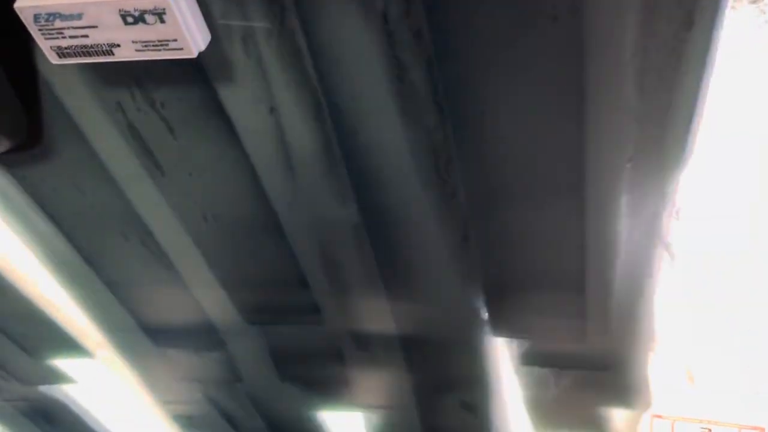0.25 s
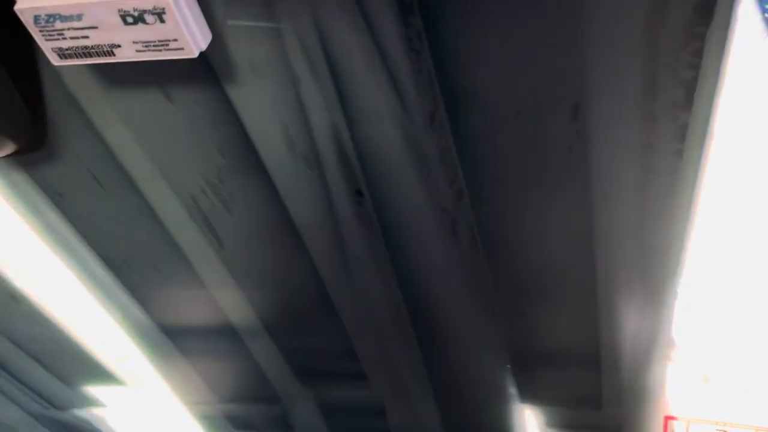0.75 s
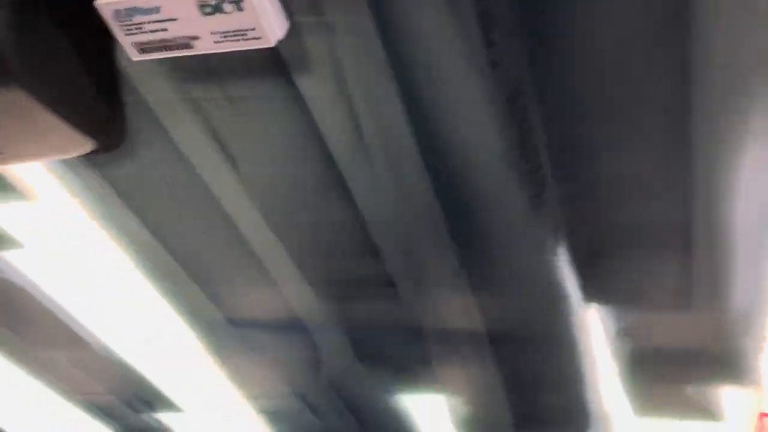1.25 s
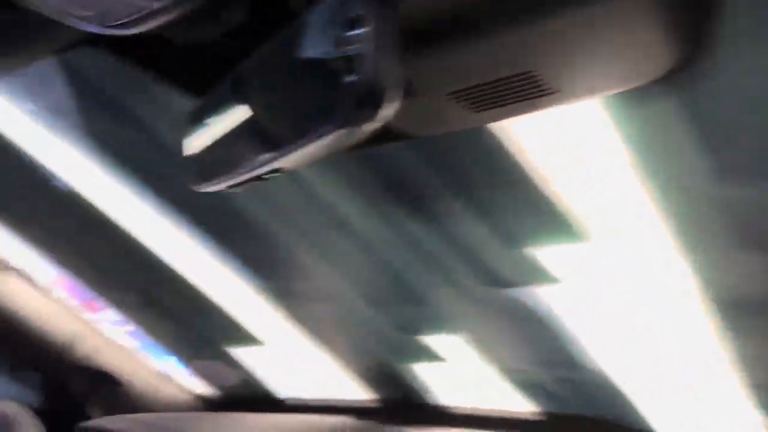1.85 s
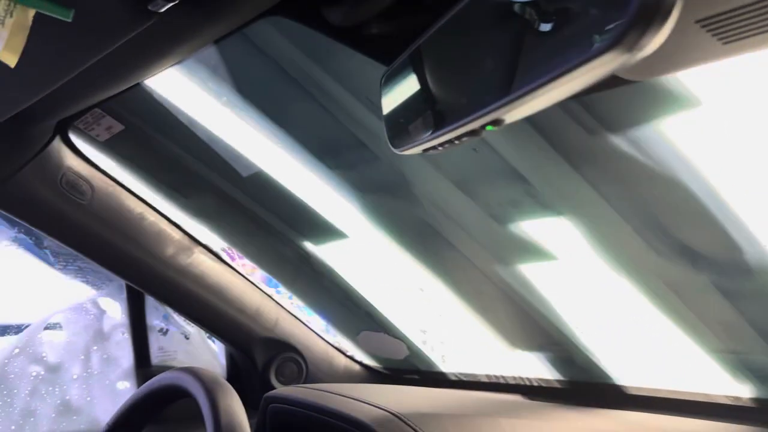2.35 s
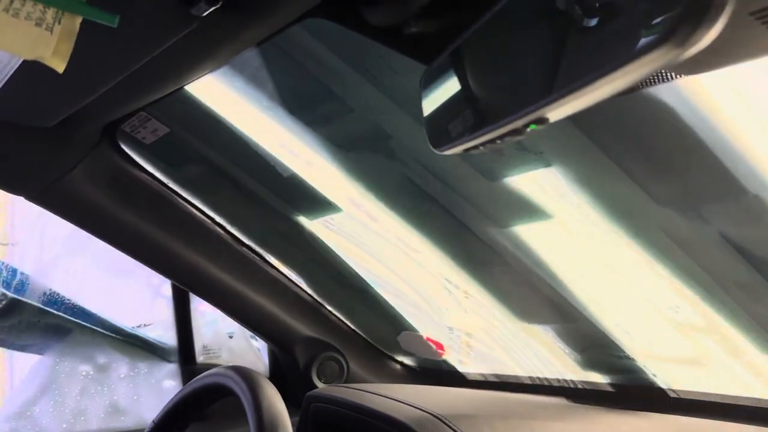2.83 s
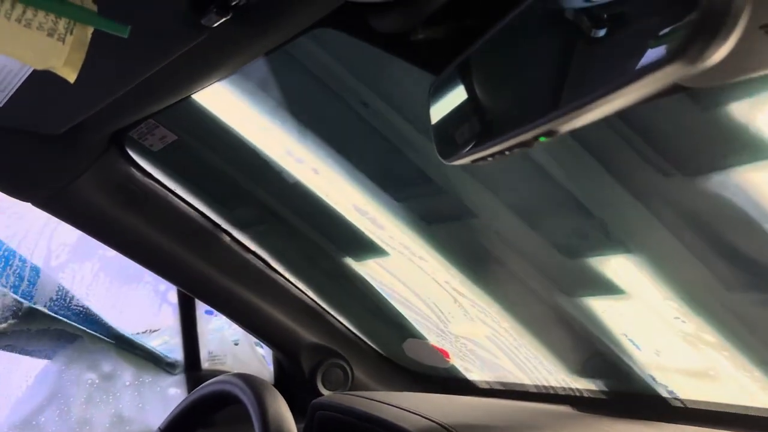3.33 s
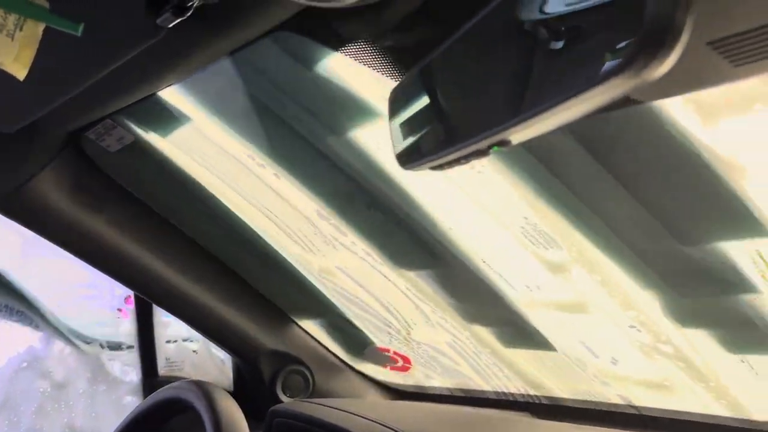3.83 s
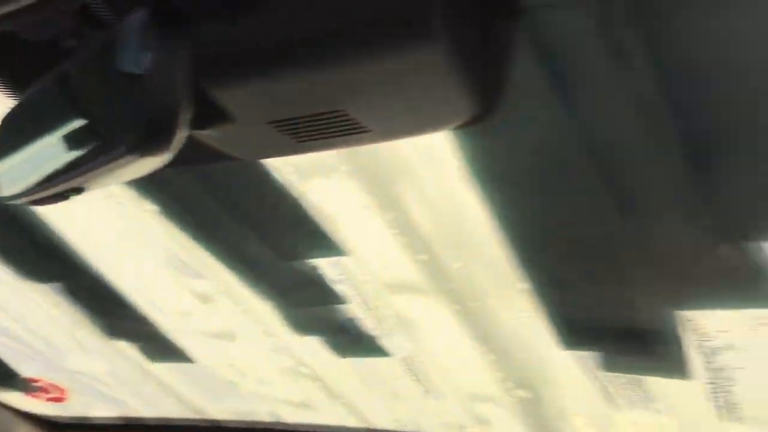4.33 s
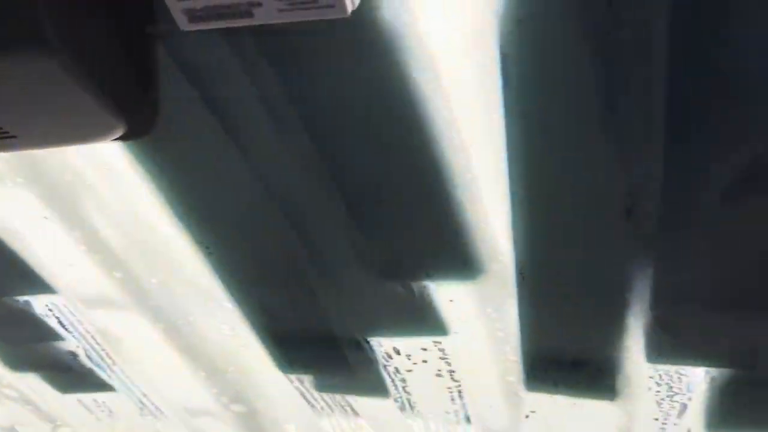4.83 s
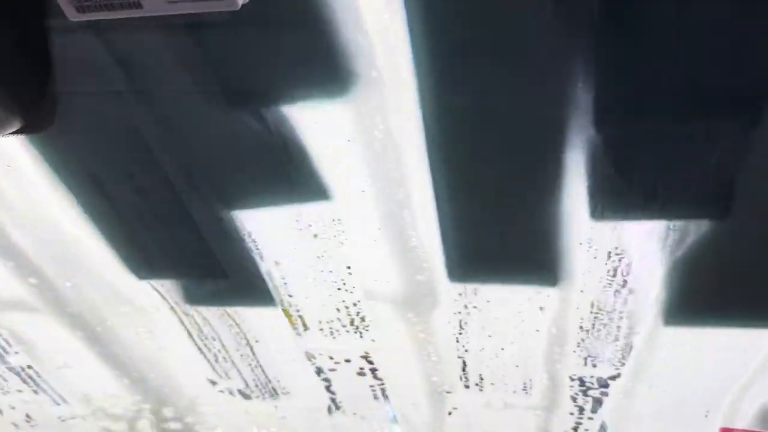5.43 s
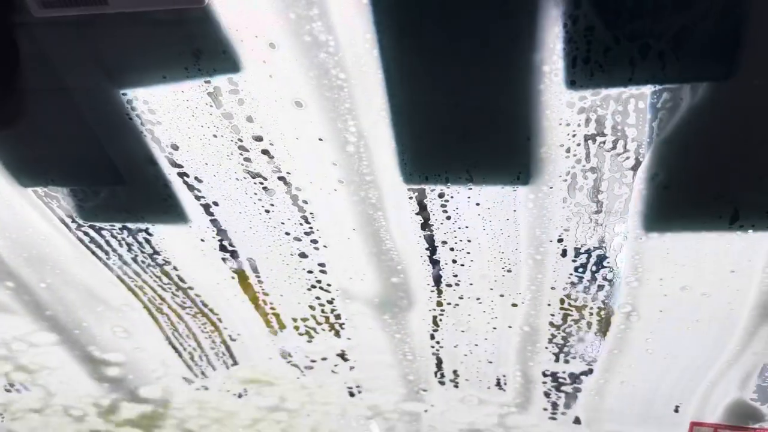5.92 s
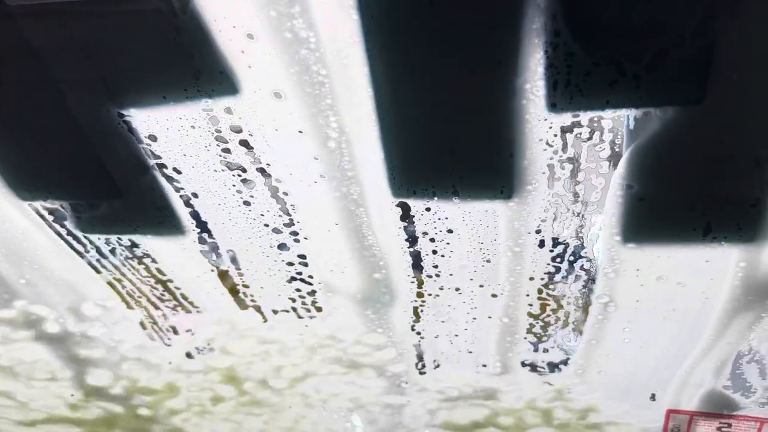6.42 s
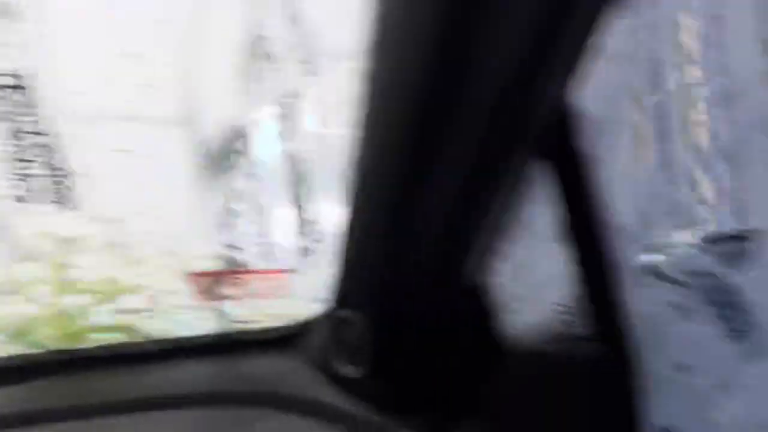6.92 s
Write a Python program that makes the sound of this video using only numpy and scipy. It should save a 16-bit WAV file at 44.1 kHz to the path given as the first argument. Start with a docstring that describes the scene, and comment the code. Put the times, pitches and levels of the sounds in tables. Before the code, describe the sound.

Inside a closed car in a wash tunnel, captured by two nearby microphones in the cabin. From 0 to 1 s a deep, uneven throb around 50 Hz dominates, over faint muffled rubbing of wet cloth on glass and a very quiet hiss. A dull panel thud comes near 0.8 s, soft knocks at 1.2-1.4 s, a slight airy swell near 1.7 s and a stronger boom at 2.0 s. Small slaps follow around 2.5 s, and it is calmest near 3-3.5 s. From 3.8 to 4.7 s the scrubbing thickens, with soft knocks and low thumps, then eases briefly. At about 5.5 s wet slaps and sharp splashy hiss break in; from 5.7 s water and cloth roar over the screen, doors and roof drum, and heavy thuds crowd together around 6.1-6.7 s. It ends at about 7.1 s on a loud, booming surge.

```python
"""Inside a car in a wash tunnel: wet cloth strips drag and slap over the windscreen and roof, then water pours on.
The cabin air throbs and booms at its lowest modes, and the body panels drum, thud and briefly ring.
The glass passes a muffled thrum, scrub and hiss: coloured noise that flutters with many small contacts.
Two microphone ports hear each sound with a likeness, delay and balance that depend on frequency."""
import sys
import numpy as np
from scipy import signal
from scipy.fft import rfft, irfft, next_fast_len
from scipy.io import wavfile
from scipy.ndimage import uniform_filter1d

SR = 44100
rng = np.random.default_rng(int(sys.argv[2]) if len(sys.argv) > 2 else 0)


def wav_out(sig):
    """Save sig, one row per channel (or a flat mono array), as 16-bit PCM at SR to the path in sys.argv[1]."""
    wavfile.write(sys.argv[1], SR, np.round(np.clip(np.atleast_2d(sig).T, -1, 1) * 32767).astype(np.int16))


N = 316197

# Strip ends landing on the glass. Each row: start in seconds, knock level in dB,
# where the knock is loudest in Hz, smack level in dB before each layer takes its share.
STRIP_SLAPS = [(1.177, -37, 450, -47), (1.243, -29.5, 500, -50), (1.37, -31, 500, -45),
               (1.414, -41, 900, -38), (2.054, -33, 900, -32), (2.095, -44, 1700, -33),
               (2.443, -37, 500, -38), (2.543, -32, 750, -30), (2.58, -39, 900, -34),
               (2.634, -36, 500, -40), (3.557, -42, 1300, -35), (3.828, -32, 900, -39),
               (3.913, -32, 750, -33), (4.052, -29, 750, -31), (4.455, -39, 2000, -32),
               (4.525, -35, 900, -30), (4.613, -33, 900, -35), (4.669, -30, 1100, -29),
               (5.187, -38, 500, -45), (5.244, -39, 1300, -31), (5.287, -31, 550, -41),
               (5.504, -42, 500, -42), (5.558, -28, 700, -29), (5.736, -32, 2000, -21),
               (6.099, -30, 600, -25), (6.205, -36, 1500, -24), (6.29, -45, 2000, -23),
               (6.794, -38, 1100, -28), (6.881, -40, 1600, -24)]
# Heavy strips landing on the panels. Each row: peak time in seconds, level in dB before each panel's share.
STRIP_THUMPS = [(0.801, -21), (1.291, -27.5), (1.99, -19), (2.349, -26.5), (3.6, -31), (4.1, -24.5),
                (4.692, -24.5), (4.862, -22), (5.281, -19.5), (5.51, -27.5), (5.691, -18.5), (5.948, -28),
                (6.128, -15), (6.322, -13), (6.492, -18.5), (6.649, -21), (6.861, -26.5), (7.039, -16)]
# Resonances of the large door panels. Each row: pitch in Hz, width in Hz, relative level in dB.
DOOR_MODES = [(71.5, 38.6, -2), (101.7, 35.7, -2), (122.3, 14.1, -2.5)]
THUMP_RISE_S = 0.0331


def amp(db):
    """Decibels to a linear gain."""
    return 10 ** (np.asarray(db) / 20)


def unit(x):
    """Scales a signal to rms 1."""
    return x / np.sqrt(np.mean(x ** 2) + 1e-20)


def along(points, hz):
    """Reads a curve of (Hz, value) points on a log frequency axis."""
    f, v = np.transpose(points)
    return np.interp(np.log(hz + 1), np.log(f + 1), v)


def curves(rows):
    """One value per sample for each column after the time."""
    s, *cols = np.transpose(rows)
    return [np.interp(np.arange(N) / SR, s, c) for c in cols]


def smooth(x):
    """Rounds off steps."""
    return uniform_filter1d(x, size=128)


def swell(peak_s, rise_s, fall_s):
    """A smooth hump of height 1 around a moment, with its own width on either side."""
    t = np.arange(0, N + 64, 64) / SR - peak_s  # one value per 64 samples
    hump = np.exp(-.5 * (t / np.where(t < 0, rise_s, fall_s)) ** 2)
    return np.repeat(hump, 64)[:N]


def filtered(x, response):
    """Passes x through a complex response of frequency."""
    m = next_fast_len(N + SR // 2)
    return irfft(rfft(x, m) * response(np.fft.rfftfreq(m, 1 / SR)), m)[..., :N]


def modes(table):
    """The response of a set of resonances; neighbours alternate in sign."""
    def response(f):
        total = 0
        for k, (centre, width, db) in enumerate(table):
            resonance = 1j * f * width / (centre * centre - f * f + 1j * f * width)
            total = total + (-1) ** k * amp(db) * resonance
        return total
    return response


def ports(hz):
    """How two unrelated noises mix at the left and right port: likeness, delay and balance."""
    # Each row: frequency in Hz, likeness of the two ports from 0 to 1.
    likeness = [(50, 0.91), (150, .92), (230, 0.56), (340, 0.42), (480, 0.31), (700, .6), (900, 0.35),
                (1200, 0.33), (1550, 0.4), (1900, 0.31), (2150, 0.3), (2900, 0.2), (4500, .1), (7000, .13),
                (9000, 0.3)]
    # Each row: frequency in Hz, phase in radians by which the left port leads.
    phase_lead = [(0, 0), (260, -0.1), (600, -1.8), (1460, -3.4), (1720, -2.9), (2070, -5.7), (2500, -6.7),
                  (2930, -9.3)]
    # Each row: frequency in Hz, left level over right in dB.
    balance = [(50, -2), (200, -0.5), (700, -3), (1500, -1.5), (4000, -.5), (5900, -6), (6900, 0),
               (9000, 0)]
    treble_lag_s = .00049  # slope of the left port's lag above the last phase point
    turn = np.arccos(np.clip(along(likeness, hz), 0, 1)) / 2
    top_hz, _ = phase_lead[-1]
    lead = np.interp(hz, *np.transpose(phase_lead))
    lead = lead - 2 * np.pi * treble_lag_s * np.maximum(hz - top_hz, 0)
    left = amp(along(balance, hz) / 2) * np.exp(.5j * lead)
    return np.array([[left * np.cos(turn), left * np.sin(turn)],
                     [np.cos(turn) / left, -np.sin(turn) / left]])


def rush(response, patchy_db):
    """Stereo noise of rms 1 through a response, with patches of random gain in time and frequency."""
    z = signal.stft(rng.standard_normal((2, N)), nperseg=512)[2]
    across_bins = uniform_filter1d(rng.standard_normal(z.shape[1:]), size=6, axis=0)
    field = uniform_filter1d(across_bins, size=10, axis=1)
    pair = signal.istft(z * amp(patchy_db * unit(field)), nperseg=512)[1]
    m = next_fast_len(N + SR // 2)
    hz = np.fft.rfftfreq(m, 1 / SR)
    at_ports = (ports(hz) * rfft(pair, m)).sum(axis=1)
    return unit(irfft(at_ports * response(hz), m)[:, :N])


def cabin():
    """The air volume throbs at its lowest mode while the strips work the front, with looser rumble around it."""
    # Swells of the lowest air mode. Each row: peak time in seconds, pitch in Hz, level in dB.
    throbs = [(.09, 47.2, -21), (0.289, 46, -17.5), (.375, 51.5, -15.5), (.53, 49.8, -20.5),
              (.73, 51.8, -17.5), (0.811, 53.9, -30), (1.001, 54.95, -25.5), (1.12, 49.8, -20),
              (1.23, 47.7, -22), (1.331, 48.3, -18.5), (1.658, 54.7, -22), (2.0, 61.16, -24),
              (2.11, 54.95, -16.5), (2.26, 52.46, -23), (2.38, 52.1, -23.5), (2.521, 51.2, -24.5),
              (2.65, 54.95, -27), (2.78, 54.5, -23), (2.9, 54.8, -25.5), (3.169, 50, -31),
              (3.28, 52.5, -30)]
    # Loose rumble of the cabin air. Each row: time in seconds, level in dB.
    boom = [(0, -31), (1.5, -27), (2.8, -30.5), (3.5, -35.5), (5.2, -30.5), (5.4, -24.5), (6.2, -25.5),
            (7.15, -24)]
    # Resonances of the air. Each row: pitch in Hz, width in Hz, relative level in dB.
    air_modes = [(50.5, 14, -10.5), (40.3, 9, -10)]
    s, hz, _ = np.transpose(throbs)
    power = sum((amp(db) * swell(at, rise_s=0.057, fall_s=0.033)) ** 2 for at, _, db in throbs)
    pitch_hz = np.interp(np.arange(N) / SR, s, hz)
    hum = np.sqrt(2) * smooth(np.sqrt(power)) * np.sin(2 * np.pi * np.cumsum(pitch_hz) / SR)

    def rumble_band(f):
        low_cut = (f / 45) ** 2 / (1 + (f / 45) ** 2)
        return modes(air_modes)(f) * low_cut / (1 + (f / 70) ** 4)

    rumble = amp(curves(boom)[0]) * rush(rumble_band, patchy_db=-1.5)
    return hum * amp([[-.2], [.2]]) + rumble  # hum a touch louder on the right


def airy():
    """The treble swells up once in a brief rustle: a hump of bright noise."""
    # Colour of the rustle. Each row: frequency in Hz, relative level in dB.
    rustle = [(3000, -30), (5000, -2), (6000, 0), (8000, -8), (10500, -13), (15000, -14)]
    level = amp(-62) * smooth(swell(1.66, rise_s=.11, fall_s=.09))
    return level * rush(lambda f: amp(along(rustle, f)), patchy_db=1)


def surges():
    """A single panel mode swells for a moment under a dragging strip, as a short sine hump."""
    # Each row: peak time in seconds, pitch in Hz, level in dB.
    ring_ups = [(.85, 159.2, -30.5), (1.2, 160, -29), (1.33, 161, -31.5), (.81, 104.8, -29),
                (1.04, 100.5, -27.5), (1.29, 105, -27), (1.56, 158, -25), (1.69, 150.1, -32),
                (2.0, 99.55, -19.5), (2.31, 85, -21.5), (2.78, 75.8, -27), (3.36, 116.1, -28.5),
                (3.62, 100.6, -31.5), (4.1, 105, -26.5), (4.19, 202.5, -23.5), (4.63, 77, -19),
                (4.699, 120, -20.5), (5.26, 95, -23), (5.831, 211.4, -22), (6.17, 72, -23.5),
                (7.05, 85.2, -15), (7.13, 110, -15.5)]
    t = np.arange(N) / SR
    tone = np.zeros(N)
    for s, hz, db in ring_ups:
        sine = np.sin(2 * np.pi * (hz * t + rng.random()))
        tone += amp(db) * swell(s, rise_s=0.011, fall_s=0.024) * sine
    return filtered(np.sqrt(2) * uniform_filter1d(tone, size=16), lambda hz: ports(hz)[:, 0])


def thuds():
    """The blow of each heavy strip rings the doors: an impulse through their resonances."""
    doors = lambda hz: modes(DOOR_MODES)(hz) / (1 + 1j * hz / 200) ** 2
    s, db = np.transpose(STRIP_THUMPS)
    blows = np.zeros(N)
    at = np.round((s - THUMP_RISE_S / 2) * SR).astype(int)  # the blow comes just ahead of the thump's peak
    blows[at] = amp(db + 3)  # dB over the thump
    single_peak = np.abs(filtered(np.eye(1, N)[0], doors)).max()
    return filtered(blows, lambda hz: doors(hz) * ports(hz)[:, 0]) / single_peak


def panels():
    """Doors, roof and bonnet each drum under their own load, and all together under a thump."""
    # Load of cloth and water. Each row: time in seconds, doors in dB, roof in dB, bonnet in dB.
    drum = [(0.0, -26, -30.5, -30), (0.08, -26, -30.5, -41.5), (0.2, -24, -33, -31.5),
            (1.021, -27.5, -35.5, -37.5), (1.65, -27.5, -30, -38), (1.79, -27.5, -51, -41.5),
            (2.01, -23.5, -31, -36.5), (2.09, -26, -40, -38), (2.85, -29, -49, -36.5),
            (2.89, -34, -61, -41.5), (3.03, -27.5, -48.5, -40.5), (4.04, -30, -32, -32),
            (4.201, -23.5, -57, -27), (4.24, -26, -22, -28), (4.84, -23.5, -34, -29),
            (4.94, -24, -27.5, -51), (5.0, -27, -34.5, -34), (5.28, -21, -29, -32.5),
            (5.38, -27.5, -29.5, -32), (5.51, -20, -25, -27), (5.63, -22, -29, -28),
            (5.69, -18.5, -20, -33), (5.81, -15.5, -29, -20.5), (5.87, -21, -25, -23.5),
            (6.15, -17, -27.5, -25.5), (6.21, -20, -19, -30), (6.29, -22, -18, -20),
            (6.41, -21.5, -27, -24), (7.09, -13, -23.5, -29), (7.15, -13, -15.5, -16)]
    # Resonances of the roof, then of the bonnet. Each row: pitch in Hz, width in Hz, relative level in dB.
    roof_modes = [(159.7, 12.3, 2.5)]
    bonnet_modes = [(184.9, 28.6, 0.5), (260, 51, -4)]

    def band(table, low_hz):
        def response(f):
            low_cut = (f / low_hz) ** 4 / (1 + (f / low_hz) ** 4)
            return modes(table)(f) * low_cut / (1 + (f / 280) ** 4)
        return response

    thump = smooth(sum(amp(db) * swell(s, THUMP_RISE_S, fall_s=0.027) for s, db in STRIP_THUMPS))
    bands = band(DOOR_MODES, low_hz=61.3), band(roof_modes, low_hz=103), band(bonnet_modes, low_hz=137)
    thump_shares_db = (-2, -16.5, -16)  # doors, roof, bonnet
    out = np.zeros((2, N))
    for level_db, share_db, panel in zip(curves(drum), thump_shares_db, bands):
        out += np.hypot(amp(level_db), amp(share_db) * thump) * rush(panel, patchy_db=0.7)
    return out


def knocks():
    """The soft end of each strip scuffs the pane for a few milliseconds; where it lands sets the colour."""
    # Resonances of the knocked pane. Each row: pitch in Hz, width in Hz, relative level in dB.
    pane = [(350, 90, -1), (520, 140, -1), (780, 200, 0), (1250, 300, -3), (2000, 500, -1)]
    rise_s, t60_s, width_octaves = .001, .045, .65
    t, hz = np.arange(4096) / SR, np.fft.rfftfreq(4096, 1 / SR)
    contact = amp(-60 * t / t60_s) * (1 - np.exp(-t / rise_s))
    out = np.zeros((2, N + len(t)))
    for s, db, centre_hz, _ in STRIP_SLAPS:
        octaves = np.log2((hz + 1) / centre_hz)
        colour = np.abs(modes(pane)(hz)) * np.exp(-.5 * (octaves / width_octaves) ** 2)
        noise = rfft(rng.standard_normal((2, len(t))))
        scuff = contact * irfft((ports(hz) * noise).sum(axis=1) * colour)
        crest_level = np.sqrt(np.mean(contact ** 2)) / contact.max()  # the knock level holds at the crest
        out[:, round(s * SR):][:, :len(t)] += amp(db) * unit(scuff) * crest_level
    return out[:, :N]


def patter(rate, t60, spread_db):
    """Gain of many small contacts at random moments: each swells quickly and fades, sizes vary a little."""
    draws = rng.random((400, 2))
    at = np.cumsum(-np.log(draws[:, 0] + 1e-9)) / rate * SR
    sizes = amp(-spread_db * np.log(draws[at < N, 1] + 1e-9))
    hits = np.bincount(at[at < N].astype(int), sizes, N)
    fading = signal.lfilter([1], [1, -amp(-60 / (t60 * SR))], hits)
    return unit(uniform_filter1d(fading, size=400))


def smacks():
    """Envelope of the strip ends hitting the glass: a quick rise and an exponential fade for each."""
    rise_s, t60_s = .004, .09
    t = np.arange(SR // 4) / SR
    slap = np.zeros(N + SR)
    for s, *_, smack_db in STRIP_SLAPS:
        slap[round(s * SR):][:len(t)] += amp(smack_db - 60 * t / t60_s) * (1 - np.exp(-t / rise_s))
    return slap[:N]


def ringing(spectrum):
    """A broad spectrum lifted at the modes of the screen."""
    # Modes of screen and cabin. Each row: pitch in Hz, width in Hz, gain added to 1 in dB.
    screen = [(371.4, 87, 0), (455.6, 73, 0), (637, 100, -1), (683, 73, -12.5), (740, 48, -20.5),
              (1150, 240, -6), (1420, 150, -16), (1695, 15, -4), (1847, 44, -1), (2027, 63, -7.5),
              (2460, 150, -11), (2760, 63, -7), (3920, 61, -9), (5230, 120, -11.5), (5540, 140, -11),
              (6130, 180, -8)]
    lift = lambda f: sum(amp(db) / (1 + (2 * (f - c) / w) ** 2) for c, w, db in screen)
    return lambda f: amp(along(spectrum, f)) * (1 + lift(f))


def glass():
    """Dragging cloth thrums, scrubs and fizzes; small contacts make all flutter together, big ones slap."""
    # Cloth and water on the car. Each row: time in seconds, thrum, body, rasp and scrub levels in dB.
    load = [(0, -41, -36, -51, -43.5), (.8, -41, -38.5, -52, -43), (1.4, -41.5, -37, -52.5, -44.5),
            (1.65, -39.5, -38, -48.5, -43), (1.9, -42.5, -40.5, -51.5, -43.5),
            (2.6, -43, -38, -51.5, -42.5), (3.4, -44, -39.5, -52.5, -44), (3.78, -42.5, -39.5, -53, -44),
            (3.84, -40, -40.5, -50.5, -39.5), (4.0, -38, -35.5, -49.5, -41.5),
            (4.25, -34.5, -34.5, -46, -38), (4.5, -33.5, -32.5, -45.5, -40), (4.68, -34, -33, -46.5, -38),
            (4.72, -37, -33.5, -52, -44), (5.1, -41.5, -38, -53.5, -43), (5.23, -35.5, -32.5, -48, -40.5),
            (5.35, -37, -35, -50.5, -42.5), (5.46, -38.5, -35, -46, -42.5),
            (5.51, -36.5, -32.5, -39.5, -38.5), (5.56, -28, -27, -38.5, -34.5),
            (5.63, -30, -31.5, -44, -37), (5.74, -23.5, -25, -35.5, -30.5),
            (5.9, -23.5, -25.5, -36.5, -31.5), (6.1, -24.5, -23.5, -37, -31),
            (6.3, -24, -24.5, -35.5, -30.5), (6.48, -22.5, -24, -38, -31.5), (6.56, -28, -27.5, -38, -32.5),
            (6.8, -27.5, -24, -41.5, -31.5), (6.9, -27, -24.5, -37.5, -28), (7.0, -28, -22.5, -41, -28.5),
            (7.15, -20.5, -21, -36, -26)]
    # Wet hiss. Each row: time in seconds, level in dB.
    spray = [(0.0, -59), (0.04, -59.5), (1.33, -60.5), (1.75, -56.5), (1.87, -59), (3.6, -59.5), (4.3, -57),
             (5.02, -59), (5.5, -55.5), (5.51, -44.5), (5.63, -52), (5.71, -50.5), (5.73, -40.5),
             (5.77, -48), (6.31, -44.5), (6.33, -48.5), (6.79, -51.5), (7.15, -44)]
    # Colours of the layers; the hiss thins out towards the top. Each row: frequency in Hz, relative level in dB.
    body = [(150, -35), (260, -1), (310, -2), (430, -8.5), (540, -5), (650, -25.5), (1200, -59)]
    thrum = [(400, -17), (580, 0), (700, 3.5), (850, 3.5), (1000, -9), (1500, -55)]
    scrub = [(700, -20.5), (950, -2.5), (1300, -3.5), (1700, -6), (2000, -29), (3000, -71)]
    rasp = [(1400, -30), (1800, -6.5), (2100, -4), (2550, -11.5), (2800, -14.5), (3300, -18), (5000, -59)]
    fizz = [(2000, -28), (3200, 0), (4000, -0.5), (4900, -3), (5800, -3), (6600, -7), (7200, -6),
            (8600, -20)]
    fizz_top = [(9800, -26), (10400, -35), (13000, -45), (15500, -43)]
    thrum_db, body_db, rasp_db, scrub_db = curves(load)
    hiss_db, = curves(spray)
    flutter = patter(rate=25, t60=0.029, spread_db=2)  # contacts per second, fade in seconds
    slap = smacks()
    # Each row: colour, level in dB, flutter depth, share of the slaps in dB, patchiness in dB.
    layers = [(body, body_db, .08, -7.5, 1.1),
              (thrum, thrum_db, .08, -2.5, 1.1),
              (scrub, scrub_db, .12, -9.5, 1.1),
              (rasp, rasp_db, .17, -10.5, 1.2),
              (fizz + fizz_top, hiss_db, .12, -22.5, .8)]
    out = np.zeros((2, N))
    for colour, level_db, depth, slap_db, patchy_db in layers:
        drag = amp(level_db) * unit(1 + depth * flutter)
        out += np.hypot(drag, amp(slap_db) * slap) * rush(ringing(colour), patchy_db)
    return out


def scene():
    """Everything heard in the cabin, summed at the two ports."""
    return cabin() + airy() + surges() + thuds() + panels() + knocks() + glass()


def record(dry):
    """The recorder drops the deepest bass, rounds off the highest peaks and keeps nothing above its band limit."""
    thin = filtered(dry, lambda hz: (1j * hz / 32) ** 2 / (1 + 1j * hz / 32) ** 2)
    rounded = thin / (1 + np.abs(thin / .95) ** 6) ** (1 / 6)
    return filtered(rounded, lambda hz: hz < 15700)


dry = scene()
out = record(dry)
wav_out(out)
```